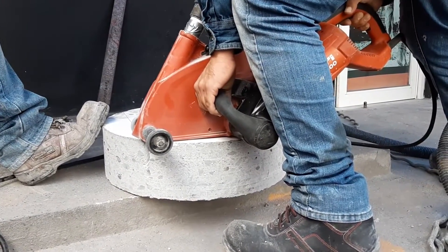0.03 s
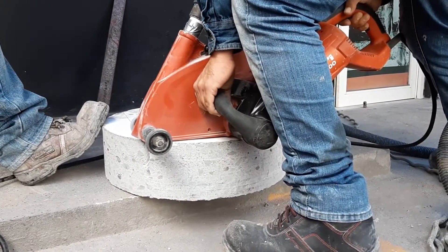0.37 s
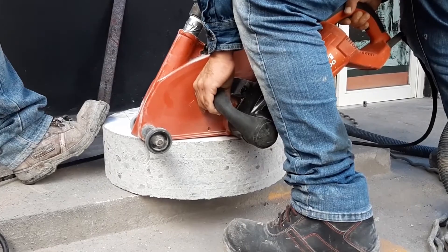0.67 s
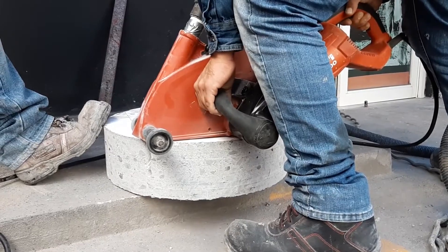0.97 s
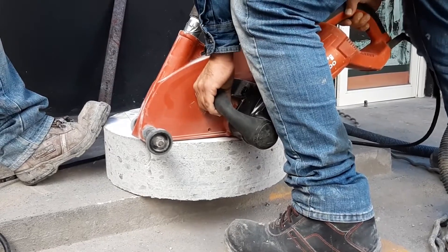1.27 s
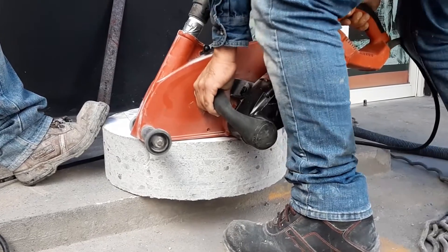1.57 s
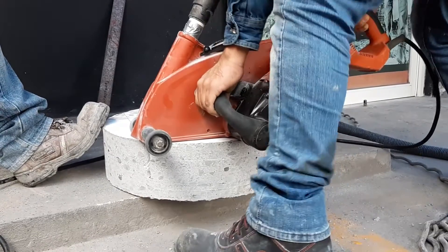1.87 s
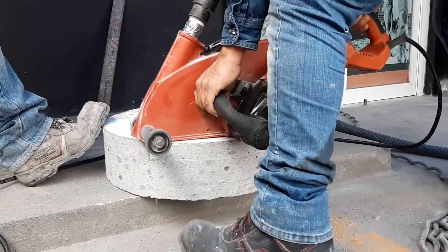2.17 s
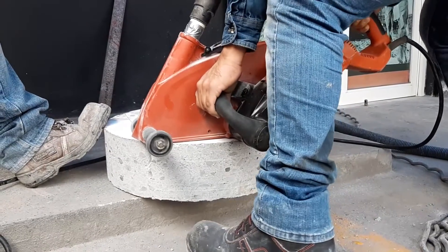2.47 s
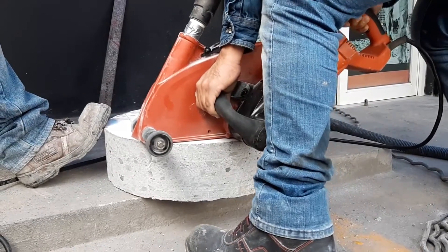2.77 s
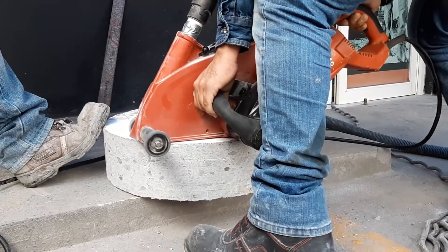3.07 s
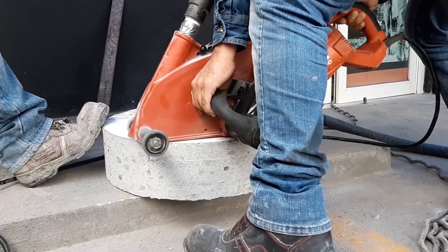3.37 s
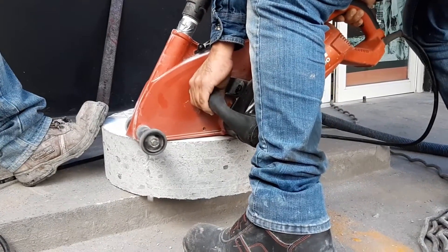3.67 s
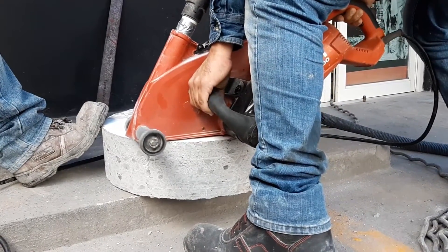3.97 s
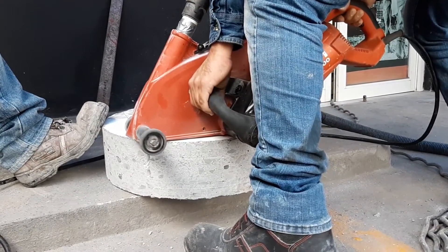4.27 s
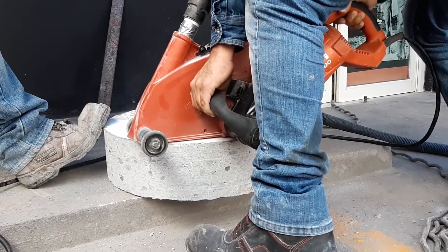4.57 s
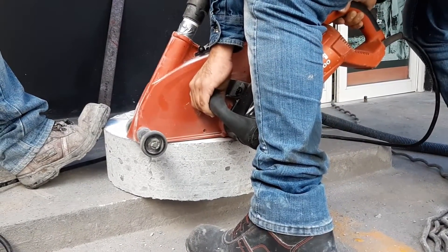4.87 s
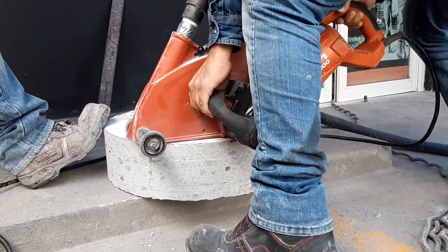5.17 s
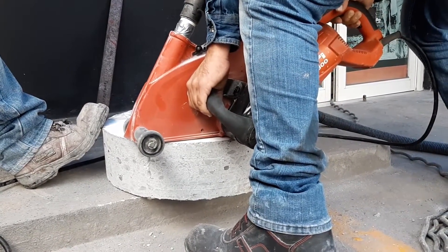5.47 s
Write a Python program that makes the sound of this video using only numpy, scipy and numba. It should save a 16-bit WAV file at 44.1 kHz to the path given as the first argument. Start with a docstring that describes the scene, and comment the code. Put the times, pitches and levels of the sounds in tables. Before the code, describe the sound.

Close by, a power saw's steel blade grinds continuously through concrete with a shrill ringing whine, gritty hiss and occasional rough squeals.

```python
"""A handheld electric diamond cutter saws dry into a concrete disc, a step away. From the start, grit
rings the steel blade into a whine that shifts with the pressure and briefly squeals, over grinding,
hissing dust, drive hum and rushing air. Near 2 s the operator shifts stance: housing and hood swell,
the hum fades and the hiss dulls. From 3 s the rubbing blade squeals roughly and the machine knocks;
after 4 s the blade binds and the hum sags in pitch. The steps add a faint echo throughout."""
import sys
import numpy as np
from scipy import signal
from scipy.fft import rfft, irfft
from scipy.io import wavfile
from scipy.ndimage import map_coordinates
from numba import njit

SR = 44100
rng = np.random.default_rng(int(sys.argv[2]) if len(sys.argv) > 2 else 0)


def to_wav(sig):
    """Store sig (one row per channel, or 1-D mono) as 16-bit WAV at the path in sys.argv[1].

    Samples outside -1..1 are clipped; the rate is SR.
    """
    pcm = np.clip(np.atleast_2d(sig), -1, 1) * 32767
    pcm = np.round(pcm).astype(np.int16)
    wavfile.write(sys.argv[1], SR, pcm.T)  # frames by channels


N = 243873
TIME = np.arange(N) / SR
FROM_MID_CUT_S = TIME - TIME.mean()
BINS = np.maximum(np.fft.rfftfreq(N, 1 / SR), 1)


def undb(db):
    """Decibels to gain."""
    return 10 ** (np.asarray(db) / 20)


def unit(x):
    """Scale to rms 1."""
    return x / np.std(x)


def curve(points):
    """An automation curve through (time_s, value) points."""
    return np.interp(TIME, *np.transpose(points))


def swell(middle_s, length_s):
    """A smooth rise from 0 to 1 and back."""
    return np.cos(np.pi * np.clip((TIME - middle_s) / length_s, -.5, .5)) ** 2


def walk(rate_hz):
    """Smooth random drift with a spread of 1."""
    return unit(irfft(rfft(rng.standard_normal(N)) / (1 + (BINS / rate_hz) ** 2), N))


def response(points):
    """Gain per frequency bin of an EQ curve through (freq_hz, gain_db) points."""
    hz, db = np.transpose(points)
    return undb(np.interp(np.log(BINS), np.log(hz), db))


def colour(x, points):
    """Shape a stereo pair with an EQ curve, at rms 1."""
    return unit(irfft(rfft(x) * response(points), N))


def ring(drive, modes):
    """Damped resonances with steep skirts, each excited by a fresh draw of the drive."""
    spectrum = 0
    for hz, width_hz, db in modes:
        detuning = (BINS ** 2 - hz ** 2) / (BINS * width_hz)
        spectrum = spectrum + rfft(drive()) * undb(db) / (1 + .5j * detuning) ** 2
    return unit(irfft(spectrum, N))


@njit
def sweep(x, hz, width_hz):
    """State-variable band-pass with a moving centre."""
    out, band_state, low_state = np.empty(len(x)), 0., 0.
    for i in range(len(x)):
        gain, damping = np.tan(np.pi * hz[i] / SR), width_hz / hz[i]
        band = (band_state + gain * (x[i] - low_state)) / (1 + gain * (gain + damping))
        band_state = 2 * band - band_state
        low_state += 2 * gain * band
        out[i] = damping * band
    return out


def steep_band(pair, hz, width_hz):
    """A stereo pair band-passed twice around a moving centre, at rms 1."""
    return unit(np.array([sweep(sweep(x, hz, width_hz), hz, width_hz) for x in pair]))


def stereo(three, shared):
    """Blend one centre signal with a separate one for each side."""
    return np.sqrt(shared) * three[0] + np.sqrt(1 - shared) * three[1:]


def turbulence(shared):
    """Stereo noise of moving air."""
    return stereo(rng.standard_normal((3, N)), shared)


def grit(per_s, spread_db, shared):
    """Diamond grains striking stone: dense clicks, a few much harder than the rest."""
    struck = rng.random((3, N)) < per_s / SR
    size = undb(spread_db * np.minimum(rng.standard_exponential((3, N)), 5))
    polarity = np.sign(rng.standard_normal((3, N)))
    return stereo(struck * size * polarity, shared)


def echo(x, t60_s, wet_db):
    """Steps and walls add a short diffuse tail, different on each side."""
    tail = rng.standard_normal((2, N)) * undb(-60 * TIME / t60_s) * (TIME > .004)
    tail /= np.sqrt(np.sum(tail ** 2, axis=1, keepdims=True))
    wet = irfft(rfft(x) * rfft(tail), N)
    return (x + undb(wet_db) * wet) / np.hypot(1, undb(wet_db))


def flutter(x, rate_hz, span_hz, depth_db):
    """Narrow bands swell and fade at random, giving the noise a coarse, fluttering texture."""
    hz, time_s, frames = signal.stft(x, SR, nperseg=1024)
    grid = np.meshgrid(hz / span_hz, time_s * rate_hz, indexing="ij")
    chance = rng.standard_normal((600, 400))
    gain = undb(depth_db * map_coordinates(chance, grid, order=3, mode="wrap"))
    return signal.istft(frames * gain / np.sqrt(np.mean(gain ** 2)), SR)[1][:, :N]


# How hard the operator leans on the cut: time_s, level_db
PRESSURE = [(0, 0.5), (.5, -1), (1.15, -0.55), (1.85, 0), (2.25, -0.5), (2.75, -.5), (3.2, 1), (3.8, 0),
            (4.45, -0.5), (4.75, 0), (5.53, 0.1)]

def pressure_db():
    """Pushing harder makes the cut louder; each layer follows by its own share."""
    return curve(PRESSURE)


def lean():
    """The machine leans and comes back (0 to 1 to 0) as the operator shifts stance."""
    return swell(middle_s=1.83, length_s=.97)


# Low-end EQ of the shaking machine: freq_hz, gain_db
RUMBLE_EQ = [(20, -17), (40, -19), (65, -10), (100, -6), (145, 1), (200, 0.5), (320, 4), (700, -27),
             (2000, -50)]
# Dull knocks: start_s, level_db
KNOCKS = [(1.455, -37), (3.52, -38), (3.785, -34), (3.87, -37), (4.02, -38)]

def rumble():
    """The machine shakes under load and knocks as it shifts on the stone."""
    decay_s = .025
    knocks = sum(undb(db) * (TIME > s) * np.exp(-np.abs(TIME - s) / decay_s) for s, db in KNOCKS)
    shake = undb(-46 + .69 * pressure_db() + 2.04 * walk(22))
    return (shake + knocks) * colour(turbulence(shared=.04), RUMBLE_EQ)


# Air column of hood and suction duct: pitch_hz, width_hz, level_db
DUCT_MODES = [(398, 32, -3), (455, 34, 0), (505, 25, -7)]
# Fader ride of that column, lower as the blade sinks: time_s, level_db
DUCT_RIDE = [(0, -34), (.7, -32.5), (1.5, -38), (2.2, -38), (3.3, -32.5), (3.6, -45), (5.53, -39)]

def duct():
    """Suction air sounds a hollow note in the duct."""
    level_db = curve(DUCT_RIDE) + .4 * walk(5.4)
    return undb(level_db) * ring(lambda: turbulence(shared=.31), DUCT_MODES)


# EQ of the rushing air: freq_hz, gain_db
AIR_EQ = [(50, -47), (150, -31), (210, -9.5), (270, -2.5), (340, 0), (470, 2), (640, 0), (780, 0),
          (1100, 1.5), (1350, 2.5), (1480, 0.5), (1620, 4), (1950, -4), (5000, -75)]

def air_rush():
    """Cooling and suction air rush through the machine."""
    level_db = -24 + pressure_db() + 2.17 * walk(53)
    return undb(level_db) * colour(turbulence(shared=.15), AIR_EQ)


# Resonances of the gear housing: pitch_hz, width_hz, level_db
HOUSING_MODES = [(798, 108, -1.5), (859, 34, -2), (950, 23, 0), (1053, 29, -8.5), (1105, 37, -1.5),
                 (1221, 35, -2), (1342, 76, -16), (1370, 39, -8.5), (1631, 31, -6.5)]

def housing_growl(angle):
    """The housing growls under load, pulsing with each turn and quietening as the blade sinks."""
    level_db = -31.5 + .16 * pressure_db() - .1 * FROM_MID_CUT_S + 4.5 * lean()
    throb_db = 1.1 * np.sin(angle) + 1.6 * walk(25)
    return undb(level_db + throb_db) * ring(lambda: turbulence(shared=.22), HOUSING_MODES)


# Blade speed: time_s, turns_per_s
BLADE_SPEED = [(0, 48.8), (.3, 49.15), (.65, 49.8), (1.1, 49.85), (1.55, 50.5), (2.1, 50.3), (2.75, 49.9),
               (3.3, 50.4), (4.05, 50.85), (4.35, 50.4), (4.6, 48.7), (4.9, 47.95), (5.53, 47.05)]

def blade_angle():
    """Angle of the blade in radians; it slows as it binds late in the cut."""
    turns_per_s = curve(BLADE_SPEED) * (1 + .0012 * walk(9))
    return 2 * np.pi * np.cumsum(turns_per_s) / SR


# Partials of the blade and its drive: speed_multiple, level_db
HUM_PARTIALS = [(8, -43.5), (9, -40), (10, -46), (14, -47), (15, -46), (16, -48), (17, -47), (18, -42),
                (19, -44), (21, -46), (22, -44.5), (26, -48), (27, -45), (46, -42), (48, -45)]
# Fader ride of the hum, dipping as the operator shifts stance: time_s, gain_db
HUM_RIDE = [(0, 4), (1.15, 2.5), (1.55, -5), (2.5, -3), (3.0, 3), (3.3, 2), (3.6, -2), (4.2, -4.5),
            (5.0, -4.5), (5.53, -2.5)]
# One partial stands out for a while: middle_s, length_s, speed_multiple, boost_db
MOANS = [(.15, 1, 26, 8), (.3, 1.2, 9, 2.5), (.55, 1.8, 8, 2), (.5, 1.8, 18, 4), (2.45, .7, 9, 8),
         (3.1, 1, 9, 2.5), (3.4, 1.3, 14, 11), (3.85, 1.2, 21, 11.5), (4.1, 1.1, 10, 6), (4.7, .9, 8, 10),
         (4.8, 1.2, 15, 15)]

def drive_hum(angle):
    """Tones locked to the blade's turn; each drifts in level and has its own phase on each side."""
    ride_db = curve(HUM_RIDE)
    out = 0
    for multiple, db in HUM_PARTIALS:
        moan_db = sum(boost * swell(s, length) for s, length, k, boost in MOANS if k == multiple)
        phase = rng.uniform(0, 2 * np.pi, (2, 1))
        level_db = db + ride_db + moan_db + 1.5 * walk(1.1)
        out = out + undb(level_db) * np.sqrt(2) * np.sin(multiple * angle + phase)
    return out


# Resonances of the hood: pitch_hz, width_hz, level_db
HOOD_MODES = [(2305, 75, 3.5), (2515, 70, 2.5), (2680, 100, -5)]
# Fader ride of the hood, easing off late in the cut: time_s, gain_db
HOOD_RIDE = [(0, -4), (.45, -0.5), (.8, -3), (1.4, -4.5), (2.5, -1), (3.4, -.5), (4.1, -2), (4.6, -3.5),
             (5.53, -3)]

def hood_ring():
    """The cut sets the hood ringing, most of all while the machine leans."""
    level_db = -30.5 + curve(HOOD_RIDE) + 1.4 * pressure_db() + 6.5 * lean() + 3.4 * walk(41)
    return undb(level_db) * ring(lambda: turbulence(shared=1), HOOD_MODES)


# Loss of top end: time_s, amount_0_to_1
DULLING = [(1.2, 0), (1.9, .45), (2.08, 1), (2.9, .65), (3.15, 0)]

def dulling():
    """The top of the hiss dulls while the operator shifts stance."""
    return curve(DULLING)


# Surges and lulls of grinding and dust: middle_s, length_s, gain_db
SPURTS = [(.55, .22, 1.5), (1.02, 0.32, 0.1), (3.77, .26, 1.5), (4.466, 0.14, -2.3), (5.37, 0.22, 0.9)]

def spurt_db():
    """More (+) or less (-) grit is thrown from the slot."""
    return sum(db * swell(s, length) for s, length, db in SPURTS)


# EQ of the dust hiss: freq_hz, gain_db
DUST_EQ = [(5000, -43), (7500, -8), (8700, 3), (9800, 3), (10400, 3), (11500, 2.5), (12200, -1),
           (13300, -6), (14500, -5), (15700, -3.5)]

def dust_hiss():
    """Fine dust leaves the slot in hissing spurts."""
    level_db = -21 + .62 * pressure_db() - .7 * dulling() + spurt_db() + .6 * walk(14)
    return undb(level_db) * colour(grit(per_s=20000, spread_db=4.5, shared=.058), DUST_EQ)


# Noise bands that swell, slide and fade: start_s, length_s, from_hz, to_hz, width_hz, level_db
SLIDING_BANDS = [(0, .44, 1290, 1320, 130, -31), (0, 2.0, 6350, 6500, 700, -28),
                 (.76, .11, 4750, 4850, 400, -22), (1.58, .11, 1010, 960, 260, -28),
                 (1.66, .1, 860, 780, 200, -30.5), (1.8, .12, 4650, 4750, 500, -23),
                 (2.47, .12, 1120, 980, 300, -25.5), (2.6, .42, 1050, 980, 260, -30.5),
                 (3.44, .22, 1600, 1630, 130, -30), (3.65, .6, 4750, 4600, 450, -24),
                 (4.5, .8, 740, 705, 90, -36)]

def sliding_bands():
    """Sliding bands of noise: scrapes, sizzles and a low falling moan as the blade slows."""
    out = 0
    for start_s, length_s, from_hz, to_hz, width_hz, db in SLIDING_BANDS:
        progress = np.clip((TIME - start_s) / length_s, 0, 1)
        hz = from_hz + (to_hz - from_hz) * progress
        band = steep_band(grit(per_s=1500, spread_db=1, shared=.3), hz, width_hz)
        out = out + undb(db) * np.sin(np.pi * progress) * band
    return out


def rim_force(angle):
    """Force at the rim: uneven over each turn, rippled by the motor's torque, jolted by chips."""
    wobble_db = .55 * np.sin(angle)
    torque_db = .5 * np.sin(2 * np.pi * 100 * TIME)
    chip_db = .35 * walk(36)
    return undb(wobble_db + torque_db + chip_db)


# Accents and dips in the whine: middle_s, length_s, gain_db
JOLTS = [(.087, .09, -2.5), (.32, .15, 1.5), (.435, .13, -2.5), (.507, .09, 2.7), (.65, .06, 1),
         (.77, .17, .8), (.868, .06, -3), (.98, .12, 2.2), (1.076, .07, 3.5), (1.19, .1, -1),
         (1.312, .07, 3.5), (1.458, .09, 2), (1.57, .19, -2.2), (1.84, .1, 1.5), (2.207, .05, 2),
         (2.236, .04, -2.5), (2.269, .05, 2.3), (2.34, .13, -2), (2.456, .06, 1.5), (2.513, .05, -2),
         (2.555, .05, 1.3), (2.61, .08, -1.5), (2.712, .05, -2.7), (2.82, .08, 2.3), (2.88, .07, -1.3),
         (3.02, .17, .7), (3.14, .1, -2), (3.306, .08, 1.3), (3.42, .07, -1.8), (3.59, .11, 2.4),
         (3.735, .08, 3.5), (3.83, .09, 1.8), (3.945, .07, 2.7), (4.046, .05, 1.7), (4.1, .07, 4),
         (4.2, .11, 2.7), (4.293, .07, 4.2), (4.395, .06, 1.7), (4.475, .08, 3), (4.69, .1, 3.8),
         (4.785, .09, 3.8), (4.87, .1, -1.3), (4.955, .08, 2.3), (5.02, .08, -1.5), (5.123, .09, 3.2),
         (5.18, .05, 2), (5.267, .06, 3), (5.34, .06, 2.3), (5.39, .09, 2.3), (5.5, .08, -2.5)]

def jolt_db():
    """The rim catches (+) or slips (-) for a moment."""
    return sum(db * swell(s, length) for s, length, db in JOLTS)


# EQ of the grinding concrete: freq_hz, gain_db
GRIND_EQ = [(1200, -29), (2000, 2), (3000, 1.5), (3300, 1.5), (4400, 3.5), (4800, 3), (5200, 1.5),
            (5480, 4), (6000, 3), (6250, 2.5), (6700, 4), (7300, -2.5), (8100, -7), (16000, -35)]

def grinding(force):
    """Diamond grains crush the concrete into a broad rasp."""
    level_db = -16.5 + .99 * pressure_db() + .25 * jolt_db() + spurt_db() + .5 * walk(24)
    return undb(level_db) * colour(force * grit(per_s=12000, spread_db=2, shared=.13), GRIND_EQ)


# High modes of the rim: pitch_hz, width_hz, level_db
RIM_MODES = [(7680, 70, -4), (9230, 90, -2), (9600, 200, -3), (10510, 200, 3), (10770, 130, 6),
             (11110, 130, 4), (11480, 190, 3), (11860, 100, 0), (12300, 130, -3), (12800, 170, -3),
             (13350, 300, -3)]

def rim_ring():
    """The rim's high modes shimmer, growing as the blade sinks deeper."""
    level_db = -24 + .3 * FROM_MID_CUT_S - 4.5 * dulling() + 2 * walk(36)
    return undb(level_db) * ring(lambda: turbulence(shared=1), RIM_MODES)


def strikes(force):
    """Grit hits the steel as hard as the rim bears on the stone."""
    return force * grit(per_s=13000, spread_db=1.1, shared=.61)


def chatter(depth_db):
    """The rim skips unevenly in the slot, about 28 times a second, making the blade's ring stutter."""
    skips = sweep(rng.standard_normal(N), hz=np.full(N, 28.), width_hz=16.)
    return undb(depth_db * unit(skips))


# Lower modes of the blade: pitch_hz, width_hz, level_db
LOW_BLADE_MODES = [(3033, 40, -13), (3177, 60, -10.5), (3290, 110, -8), (3420, 120, -12), (3575, 75, -3.5),
                   (3637, 55, -.5), (3725, 45, -7)]
# Fader ride of those modes: time_s, gain_db
LOW_BLADE_RIDE = [(0, 1), (.9, 2.5), (1.3, -0.5), (2.1, 1.5), (2.8, -1.5), (3.1, 0.5), (3.9, 0),
                  (4.4, -1.5), (4.9, 0), (5.5, -.5)]

def low_blade_ring(force):
    """Grit rings the blade's lower modes, giving body under the whine."""
    level_db = -20 + curve(LOW_BLADE_RIDE) + pressure_db()
    return undb(level_db) * chatter(depth_db=1.5) * ring(lambda: strikes(force), LOW_BLADE_MODES)


# Blade squeals: middle_s, length_s, pitch_hz, level_db, beat_hz, roughness_0_to_1
SQUEALS = [(.33, .25, 4178, -22.5, 0, .4), (.87, 1.15, 4307, -19.5, 0, .3),
           (2.76, 0.45, 4307, -23.5, 0, .3), (3.04, .45, 3648, -23, 19, 1), (3.36, .4, 3648, -22, 21, 1),
           (3.82, .7, 3650, -24.5, 12, .9), (3.6, 1.1, 4095, -25.5, 0, .5), (4.85, .7, 3645, -28, 12, 1),
           (5.35, .35, 4125, -24, 0, .3)]

def squeals():
    """A mode feeds itself while the blade's side rubs; a weaker twin just below can make it beat."""
    twin_db = -3
    out = 0
    for middle_s, length_s, hz, db, beat_hz, roughness in SQUEALS:
        phase = 2 * np.pi * np.cumsum(hz * (1 + roughness * .006 * walk(45))) / SR
        lag = 2 * np.pi * np.cumsum(beat_hz * (1 + .2 * walk(8))) / SR
        pair = np.sin(phase) + undb(twin_db) * np.sin(phase - lag)
        flicker = undb(3 * walk(45))
        out = out + undb(db) * swell(middle_s, length_s) * unit(flicker * pair)
    return out


# Main modes of the blade: pitch_hz, width_hz, level_db
BLADE_MODES = [(3870, 54, -5.5), (3990, 33, 4), (4118, 97, -5), (4090, 150, -7), (4184, 65, -7.5),
               (4283, 96, -7.5), (4327, 54, 1), (4473, 45, -2), (4770, 160, -8)]
# Centre of the whine's moving band: time_s, pitch_hz
WHINE_PITCH = [(0.0, 4190), (0.33, 4170), (.62, 4270), (1.05, 4300), (1.45, 4170), (1.8, 4170),
               (2.25, 4270), (2.55, 4110), (4.62, 4080), (4.8, 4190), (5.1, 4130), (5.5, 4110)]

def blade_whine(force):
    """Grit rings the steel disc; modes clamped in the slot crowd into a band that shifts with pressure."""
    crowded = steep_band(strikes(force), curve(WHINE_PITCH), width_hz=370)
    modes = ring(lambda: strikes(force), BLADE_MODES)
    steel = unit(undb(1.5) * crowded + modes)
    # deep in the slot the blade lets go between its bites
    let_go_db = -1.4 * np.clip((TIME - 3.4) / .3, 0, 1)
    level_db = -16.5 + pressure_db() + jolt_db() + let_go_db
    return undb(level_db) * chatter(depth_db=1.1) * steel


def scene():
    """The cutter at work, close by: whine, squeals and hum over a fluttering bed, with a faint echo."""
    angle = blade_angle()
    force = rim_force(angle)
    machine = rumble() + duct() + air_rush() + housing_growl(angle) + hood_ring()
    cut = dust_hiss() + sliding_bands() + grinding(force) + rim_ring() + low_blade_ring(force)
    bed = flutter(machine + cut, rate_hz=22, span_hz=110, depth_db=1.7)
    return echo(bed + drive_hum(angle) + squeals() + blade_whine(force), t60_s=.15, wet_db=-13)


# Stereo balance at the microphone: freq_hz, left_minus_right_db
BALANCE = [(90, -0.5), (200, -6.5), (320, -3.5), (400, -0.5), (620, -2.5), (900, -0.5), (2400, -.5),
           (4400, -.5), (8000, 0.1), (11000, -1.5), (15000, -4)]
# Phase between the sides, bent by the microphone's body: freq_hz, left_lead_rad
PHASE_LEAD = [(150, 0), (600, 0.7), (1600, 1), (2400, 0.1), (3000, 1.1), (3600, 1.76), (4000, 0.5),
              (4450, -1.4), (5300, -4.5), (7000, -0.5), (10800, -1), (11500, -5), (15000, -4)]

def record(dry):
    """The microphone's sides differ in colour and phase; rare peaks are rounded off and the top is cut."""
    lead_rad = np.interp(BINS, *np.transpose(PHASE_LEAD))
    left = np.sqrt(response(BALANCE)) * np.exp(.5j * lead_rad)
    heard = irfft(rfft(dry) * np.array([left, 1 / left]), N)
    rounded = heard / (1 + heard ** 8) ** (1 / 8)
    top_hz = 15750
    return signal.sosfilt(signal.ellip(12, .1, 70, top_hz, fs=SR, output="sos"), rounded)


dry = scene()
out = record(dry)
to_wav(out)
```